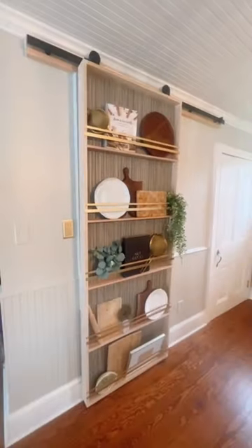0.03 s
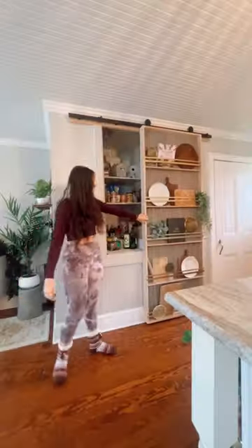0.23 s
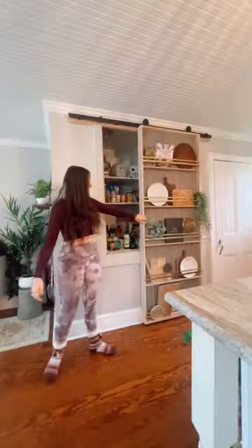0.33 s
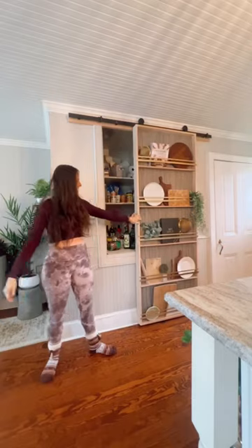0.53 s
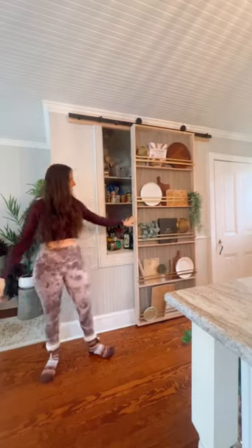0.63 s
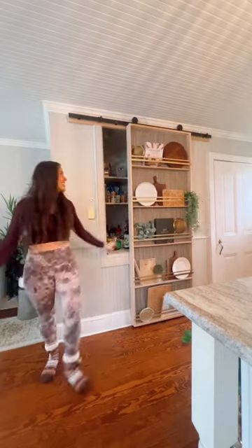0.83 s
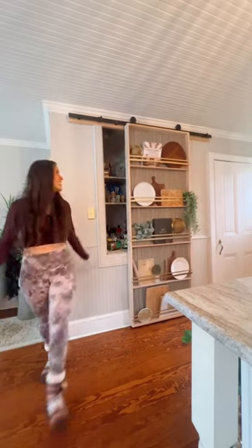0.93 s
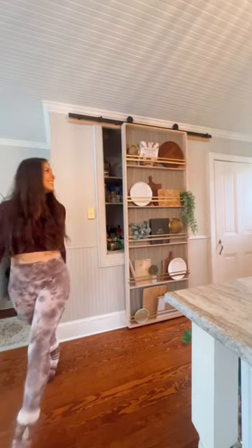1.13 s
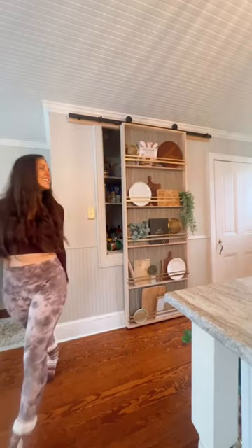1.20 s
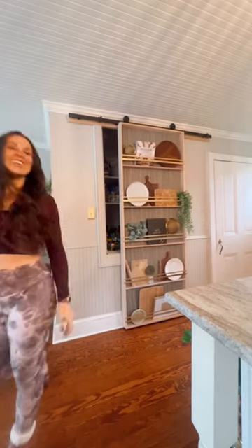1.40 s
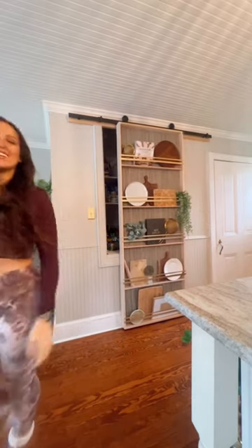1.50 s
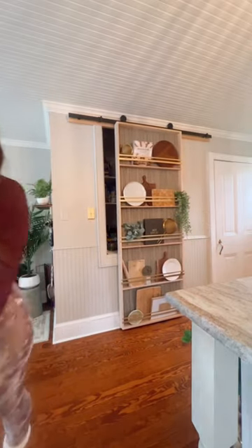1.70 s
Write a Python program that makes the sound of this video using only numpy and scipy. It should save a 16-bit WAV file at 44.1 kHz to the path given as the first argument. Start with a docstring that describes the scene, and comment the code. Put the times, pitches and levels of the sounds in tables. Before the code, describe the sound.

A heavy wooden sliding door rumbles along a steel track with a faint wheel whine, knocking and rattling the plates on its shelves. As it stops, soft footsteps thud on floorboards, a few metres away in a small room.

```python
"""Sliding door with shelves

A heavy wooden door rolls along a steel track: grit shakes the panel, the wheels grind, one whines.
Hangers click, the door knocks, and plates on its shelves rattle as it coasts to rest.
Feet in socks thud on floorboards and clothing swishes, a few metres away in a small live room."""
import sys
import numpy as np
from scipy import signal
from scipy.fft import rfft, irfft, next_fast_len
from scipy.io import wavfile
from scipy.ndimage import uniform_filter1d, map_coordinates

SR = 44100
rng = np.random.default_rng(int(sys.argv[2]) if len(sys.argv) > 2 else 0)


def wrap_up_sound(samples):
    """Save the sound to the file named by the first command line argument, as 16-bit audio."""
    columns = np.atleast_2d(samples).T
    # keep every value between -1 and 1, then stretch to whole-number steps
    tamed = np.clip(columns, -1, 1)
    steps = np.round(tamed * 32767).astype(np.int16)
    wavfile.write(sys.argv[1], SR, steps)


N = 77175

# rolling effort (time [s], level [dB])
EFFORT_DB = [(.18, -59), (.21, -42), (.3, -40), (.42, -39), (.5, -42), (.56, -38), (.6, -43.5), (.7, -39.5),
             (.79, -45.5), (.87, -46.5), (.95, -48.5), (1.1, -48), (1.3, -56.5), (1.55, -64), (1.75, -66)]
# door panel resonances (frequency [Hz], width [Hz], gain [dB])
PANEL_MODES = [(162.2, 9.9, 0.5), (260.4, 23, -4), (307.3, 30.6, 1), (381.5, 6.5, -2), (471.7, 4.5, -15.5),
               (679, 82, -15.5), (899, 5.6, -7), (1065, 3.5, -19), (1217, 7.3, -19)]
# steel track resonances (frequency [Hz], width [Hz], gain [dB])
TRACK_MODES = [(1625, 17, 7), (1968, 9.4, 3), (3480, 17, 2), (4140, 15, -0.5), (6740, 22, -3.5)]
# floor resonances under the door (frequency [Hz], width [Hz], gain [dB])
BOOM_MODES = [(54.6, 12.5, -0.5), (85, 54, -17), (165, 16.5, -5.5)]
# wheel grinding (frequency [Hz], density [dB])
GRIND_SPECTRUM = [(35, -27), (100, -7), (250, -4.5), (600, 0), (1150, -3.5), (2200, -17), (4000, -21),
                  (7000, -19), (10500, -35), (15000, -52)]
# grinding envelope (time [s], level [dB])
GRIND_DB = [(.18, -53), (.22, -49.5), (.31, -44.5), (.42, -47), (.5, -51.5), (.6, -51), (.72, -49.5),
            (.8, -50), (.88, -54.5), (1, -61), (1.2, -62.5), (1.75, -75)]
# wheel whine (frequency [Hz], gain [dB])
WHINE_PARTIALS = [(2570, 16.5), (3176, 2)]
# whine envelope (time [s], level [dB])
WHINE_DB = [(.17, -62.5), (.27, -58), (.38, -57.5), (.425, -53.5), (.48, -71.5), (.545, -57), (.6, -71),
            (.7, -95)]
# hollow panel bumps (time [s], level [dB], pitch [Hz])
BUMP_HITS = [(0.401, -35.5, 335), (.455, -31, 294.6), (.622, -39, 378), (.7, -38, 343.4), (.725, -43, 382),
             (0.877, -41, 274)]
# low modes of a bump (pitch ratio [-], gain [dB])
BUMP_PARTIALS = [(.55, -11.5), (1, 1.5), (1.27, -12)]
# door and shelf knocks (time [s], level [dB], ring gain [dB], pitch ratio [-], tilt [dB/octave])
KNOCK_HITS = [(.3165, -38.5, 14.5, .92, -3.5), (.338, -41, 4, 0.93, -5.5), (.428, -49, 8, .49, -8),
              (.626, -37.5, 4, 0.99, -4), (0.6752, -38.5, 17.5, 0.98, 1.5), (.700, -38.5, -12, 0.53, -2),
              (.912, -50, 14.5, 0.95, -9)]
# wood ring at pitch ratio 1 (frequency [Hz], gain [dB], t60 [s])
WOOD_MODES = [(754, -11.5, 0.042), (1130, -5, 0.027), (1207.7, 2, .042), (1330, -9, 0.037),
              (1720, -24, 0.029)]
# contact noise of knocks and plates (frequency [Hz], density [dB])
CLACK_SPECTRUM = [(100, -18), (350, -11), (800, 9.5), (1250, 4), (2200, 4.5), (4000, -6.5), (7000, -13.5),
                  (15000, -32)]
# shelf jolts (time [s], level [dB], tilt [dB/octave])
RATTLE_HITS = [(.322, -41.5, 0), (.681, -40.5, 1.5), (.911, -47, -4.5), (.997, -51.5, 3), (1.078, -53, 0)]
# plates and rails (frequency [Hz], gain [dB], t60 [s])
PLATE_MODES = [(1163, -6.5, 0.32), (1209, -2.5, 0.14), (1605, -9, 0.32), (1713, -14, 0.11),
               (2000, -12, 0.19), (2710, -12.5, 0.16), (4010, -17.5, 0.16), (6920, -23.5, 0.16)]
# wheel and hanger contacts (time [s], level [dB], tilt [dB/octave])
CLICK_HITS = [(0.3143, -31.5, -8.5), (.6188, -31.5, 0), (0.6207, -30.5, -0.5), (0.626, -51, 6)]
# steel click (frequency [Hz], density [dB])
STEEL_SPECTRUM = [(400, -8), (1300, 8), (2300, 7.5), (4000, -6.5), (7000, -5), (12000, -2.5), (13500, -16)]
# footfalls (time [s], level [dB])
STEP_HITS = [(1.166, -32.5), (1.376, -46), (1.467, -44), (1.643, -57)]
# floorboards (frequency [Hz], gain [dB], t60 [s])
BOARD_MODES = [(52, 9, .16), (83, -17, 0.068), (167.8, -9.5, 0.36), (245, -9, 0.22)]
# sock on wood (frequency [Hz], density [dB])
SOLE_SPECTRUM = [(120, 6), (300, -4), (800, 2.5), (2800, -6.5), (4500, -12), (12000, -33)]
# clothing swishes (time [s], level [dB], half width [s])
CLOTH_STROKES = [(1.3, -65.5, 0.076), (1.48, -62, 0.075)]
# fabric friction (frequency [Hz], density [dB])
CLOTH_SPECTRUM = [(300, 4), (1500, 5), (4000, 2.5), (9000, -0.5), (15000, -7)]
# room background (frequency [Hz], density [dB])
AIR_SPECTRUM = [(28, -5), (55, 1.5), (250, -2), (600, -17), (2000, -22), (5100, -26.5), (6500, -19.5),
                (10000, -35), (15500, -36.5)]
# reverberation (frequency [Hz], t60 [s])
ROOM_T60_S = [(100, 0.61), (1000, 0.49), (4000, 0.35), (12000, 0.16)]


def amp(db):
    """Decibels to gain."""
    return 10 ** (np.asarray(db) / 20)


def unit(x):
    """Scale to rms 1."""
    return x / np.sqrt(np.mean(x ** 2) + 1e-20)


def along(points, hz):
    """Interpolate (frequency [Hz], value) on a log axis."""
    freqs_hz, values = np.transpose(points)
    return np.interp(np.log(hz + 1), np.log(freqs_hz + 1), values)


def curve(points):
    """Interpolate (time [s], value) per sample."""
    return np.interp(np.arange(N) / SR, *np.transpose(points))


def wobble(knots_per_s):
    """Smooth random curve, rms near 1."""
    return map_coordinates(rng.standard_normal(N // 50), [np.arange(N) * knots_per_s / SR], mode="wrap")


def filtered(x, response):
    """Apply a frequency response."""
    size = next_fast_len(len(x) + SR // 2)
    return irfft(rfft(x, size) * response(np.fft.rfftfreq(size, 1 / SR)), size)[:len(x)]


def noise(spectrum, size, tilt_db_oct=0):
    """Coloured noise, rms 1, tilted above its lowest point."""
    gain = lambda hz: amp(along(spectrum, hz) + tilt_db_oct * np.log2(np.maximum(hz, spectrum[0][0])))
    return unit(filtered(rng.standard_normal(size), gain))


def resonate(x, modes):
    """Parallel band-pass resonators, output rms 1."""
    response = lambda f: sum(amp(db) * 1j * f * width / (hz * hz - f * f + 1j * f * width)
                             for hz, width, db in modes)
    return unit(filtered(x, response))


def even(x, share=0.86, window_s=0.0184):
    """Steady the loudness by partly dividing out the slow envelope; output rms 1."""
    power = np.abs(uniform_filter1d(x ** 2, round(window_s * SR))) + 1e-9
    return unit(x / power ** (share / 2))


def decay(t, t60_s):
    """Fall of 60 dB in t60_s."""
    return amp(-60 * t / t60_s)


def struck(modes, t, attack_s, pitch_ratio=1):
    """Damped modes, 1 dB scatter, soft onset."""
    ring = sum(amp(db + rng.normal(0, 1)) * decay(t, t60_s) * np.sin(2 * np.pi * hz * pitch_ratio * t)
               for hz, db, t60_s in modes)
    return ring * (1 - np.exp(-(t / attack_s) ** 2))


def add(out, time_s, x):
    """Mix x into out at time_s."""
    part = out[round(time_s * SR):][:len(x)]
    part += x[:len(part)]


def in_room(x, wet_db, rise_s=0.003):
    """Add a fresh room tail; treble dies first."""
    hz, t, bins = signal.stft(rng.standard_normal(SR * 3 // 4), SR, nperseg=256)
    tail = signal.istft(bins * decay(t, along(ROOM_T60_S, hz)[:, None]), SR, nperseg=256)[1]
    tail *= 1 - np.exp(-(np.arange(len(tail)) / SR / rise_s) ** 2)
    response = amp(wet_db) * tail / np.linalg.norm(tail)
    response[0] += 1
    return signal.fftconvolve(x, response)


def grit(rate_per_s=5000, scatter_db=4):
    """Tiny random bumps under the wheels."""
    impulses = (rng.random(N) < rate_per_s / SR) * rng.choice([-1, 1], N)
    return impulses * amp(scatter_db * rng.standard_normal(N))


def rumble(panel_db=-5, panel_slope=0.94, track_db=-23, track_slope=1.75):
    """Grit shakes panel and track. Slopes: dB per dB of effort."""
    effort_db = curve(EFFORT_DB)
    peak_db = effort_db.max()
    relative_db = effort_db - peak_db
    panel = amp(peak_db + panel_db + panel_slope * relative_db) * even(resonate(grit(), PANEL_MODES))
    track = amp(peak_db + track_db + track_slope * relative_db) * resonate(grit(), TRACK_MODES)
    return panel + track


def wheel_grind():
    """Wheels grind on steel, fading before the rumble."""
    contacts = in_room(grit(), wet_db=5.5)[:N]
    return amp(curve(GRIND_DB)) * unit(filtered(contacts, lambda hz: amp(along(GRIND_SPECTRUM, hz))))


def floor_boom(level_db=-53.5, slope=0.27, cutoff_hz=240):
    """The floor booms under the door, weakly following effort."""
    effort_db = curve(EFFORT_DB)
    boom = filtered(resonate(grit(), BOOM_MODES), lambda hz: 1 / (1 + (hz / cutoff_hz) ** 4))
    return amp(level_db + slope * (effort_db - effort_db.max())) * even(boom)


def panel_hum(pitch_hz=298, wander_hz=9.16, gain_db=-7):
    """Rolling wheels sustain the panel's main mode."""
    hz = pitch_hz + wander_hz * wobble(29.92)
    tone = unit(np.sin(2 * np.pi * np.cumsum(hz) / SR))
    return amp(curve(EFFORT_DB) + gain_db + wobble(26.4)) * tone


def wheel_whine(waver_hz=14.1, flutter_db=2, rasp_width_hz=77, rasp_db=-9):
    """One wheel sings, unsteady and rough, during the push."""
    tone = np.zeros(N)
    for hz, db in WHINE_PARTIALS:
        gain = amp(db + flutter_db * wobble(119.6))
        cycles = np.cumsum(hz + waver_hz * wobble(120.9)) / SR
        tone += gain * np.sin(2 * np.pi * cycles)
    rasp = resonate(rng.standard_normal(N), [(hz, rasp_width_hz, db) for hz, db in WHINE_PARTIALS])
    return amp(curve(WHINE_DB)) * (unit(tone) + amp(rasp_db) * rasp)


def panel_bumps(t60_s=0.13, attack_s=0.0024):
    """The panel jolts on its hangers and sounds its low modes."""
    out, t = np.zeros(N), np.arange(SR // 4) / SR
    envelope = decay(t, t60_s) * (1 - np.exp(-t / attack_s))
    for time_s, db, hz in BUMP_HITS:
        body = sum(amp(gain_db) * np.sin(2 * np.pi * hz * ratio * t) for ratio, gain_db in BUMP_PARTIALS)
        add(out, time_s, amp(db) * in_room(body * envelope, wet_db=-6))
    return out


def wood_knocks(clack_db=-1.5, clack_t60_s=0.083, clack_attack_s=0.0032):
    """Door and shelves knock: a clack plus a short wooden ring."""
    out, t = np.zeros(N), np.arange(SR // 4) / SR
    envelope = decay(t, clack_t60_s) * (1 - np.exp(-t / clack_attack_s))
    for time_s, db, ring_db, pitch_ratio, tilt_db_oct in KNOCK_HITS:
        ring = struck(WOOD_MODES, t, attack_s=0.0042, pitch_ratio=pitch_ratio)
        clack = noise(CLACK_SPECTRUM, len(t), tilt_db_oct) * envelope
        add(out, time_s, amp(db + ring_db) * in_room(ring, wet_db=-11))
        add(out, time_s, amp(db + clack_db) * in_room(clack, wet_db=-3.5))
    return out


def plate_rattles(attack_s=0.0024, scatter_db=2.2, tap_db=-0.5):
    """Jolts tap plates against rails; they ring at their own pitches."""
    out, t = np.zeros(N), np.arange(SR // 2) / SR
    onset = 1 - np.exp(-t / attack_s)
    for time_s, db, tilt_db_oct in RATTLE_HITS:
        ring = np.zeros(len(t))
        for hz, gain_db, t60_s in PLATE_MODES:
            octaves = np.log2(hz / PLATE_MODES[0][0])
            gain = amp(gain_db + tilt_db_oct * octaves + rng.normal(0, scatter_db))
            ring += gain * decay(t, t60_s) * np.sin(2 * np.pi * (hz * t + rng.random()))
        tap = amp(tap_db) * noise(CLACK_SPECTRUM, len(t), tilt_db_oct) * decay(t, t60_s=0.05)
        add(out, time_s, amp(db) * in_room((ring + tap) * onset, wet_db=-4.5))
    return out


def hanger_clicks():
    """Wheel and hanger snap against the track and rebound."""
    out, t = np.zeros(N), np.arange(SR // 10) / SR
    for time_s, db, tilt_db_oct in CLICK_HITS:
        click = noise(STEEL_SPECTRUM, len(t), tilt_db_oct) * decay(t, t60_s=0.006)
        add(out, time_s, amp(db) * in_room(click, wet_db=-2.5))
    return out


def footsteps():
    """Soft heels set the floorboards booming."""
    out, t = np.zeros(N), np.arange(SR // 2) / SR
    for time_s, db in STEP_HITS:
        thud = struck(BOARD_MODES, t, attack_s=0.027)
        add(out, time_s, amp(db) * in_room(thud, wet_db=-13))
    return out


def sock_scuff(time_s=1.271, level_db=-49, attack_s=0.0018):
    """The sole rolls down and brushes the boards after the heaviest step."""
    out, t = np.zeros(N), np.arange(SR // 4) / SR
    brush = noise(SOLE_SPECTRUM, len(t)) * decay(t, t60_s=0.08) * (1 - np.exp(-t / attack_s))
    add(out, time_s, amp(level_db) * in_room(brush, wet_db=-2.5))
    return out


def clothing():
    """Fabric brushes past with each stride."""
    t = np.arange(N) / SR
    strokes = sum(amp(db) * np.exp(-0.5 * ((t - time_s) / width_s) ** 2)
                  for time_s, db, width_s in CLOTH_STROKES)
    return strokes * amp(wobble(150)) * noise(CLOTH_SPECTRUM, N)


def room_air(level_db=-57, ripple_db=2, ripple_width_hz=43):
    """Steady hiss; the room adds fine spectral peaks and dips."""
    ripple = rng.standard_normal(N // 20)
    colour = lambda hz: amp(ripple_db * map_coordinates(ripple, [hz / ripple_width_hz], mode="wrap"))
    return amp(level_db) * unit(filtered(noise(AIR_SPECTRUM, N), colour))


def scene():
    """Door, walker and room; mono."""
    rolling = rumble() + wheel_grind() + floor_boom() + panel_hum() + wheel_whine()
    impacts = panel_bumps() + wood_knocks() + plate_rattles() + hanger_clicks()
    walker = footsteps() + sock_scuff() + clothing()
    return (rolling + impacts + walker + room_air())[None]


def record(dry):
    """Quick fade-in from silence; the microphone drops deep bass and top."""
    start_s, fade_s = 0.1686, 0.023
    low_cut_hz, top_hz = 30.4, 15900
    fade = np.clip((np.arange(N) / SR - start_s) / fade_s, 0, 1)
    high_passed = filtered(dry[0], lambda hz: hz ** 6 / (hz ** 6 + low_cut_hz ** 6))
    return filtered(high_passed * fade, lambda hz: hz < top_hz)[None]


dry = scene()
out = record(dry)
wrap_up_sound(out)
```